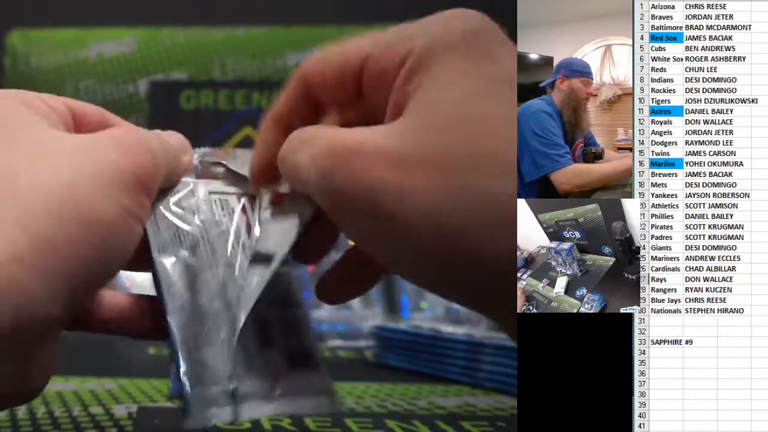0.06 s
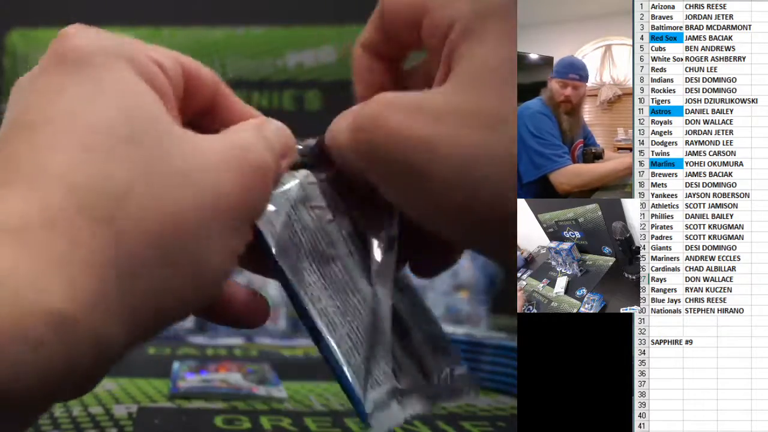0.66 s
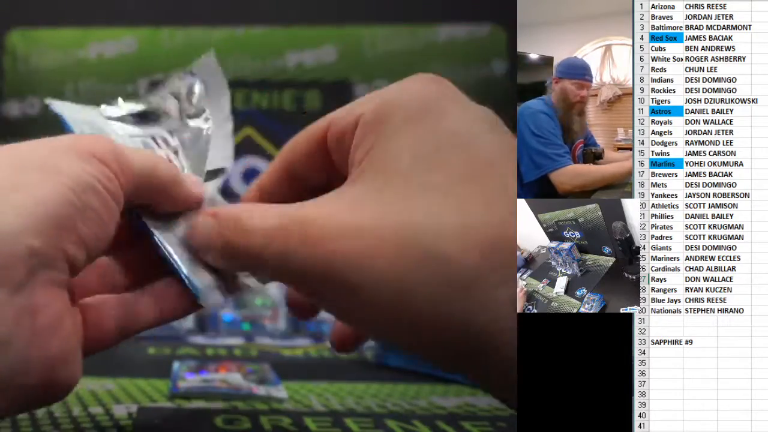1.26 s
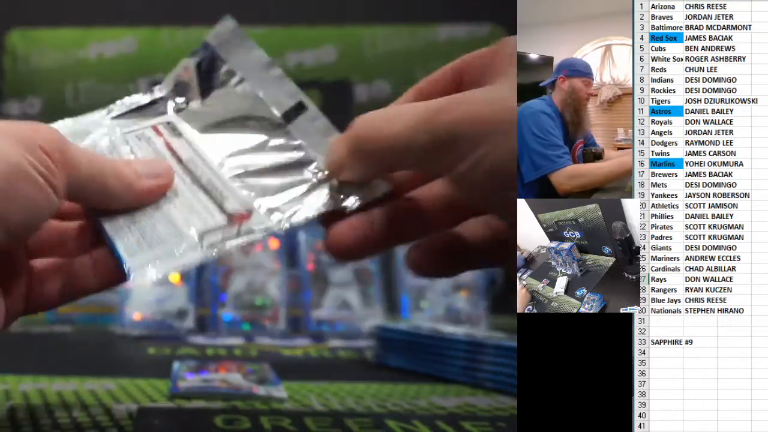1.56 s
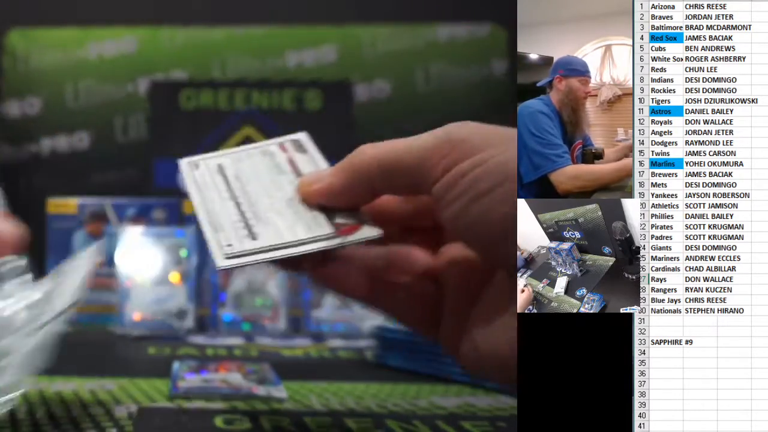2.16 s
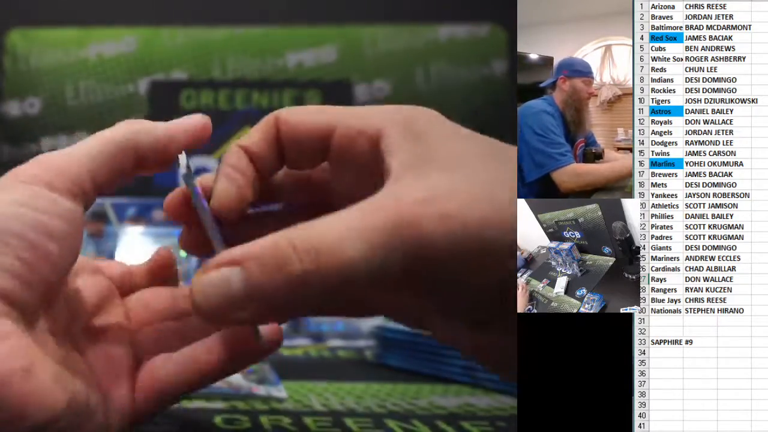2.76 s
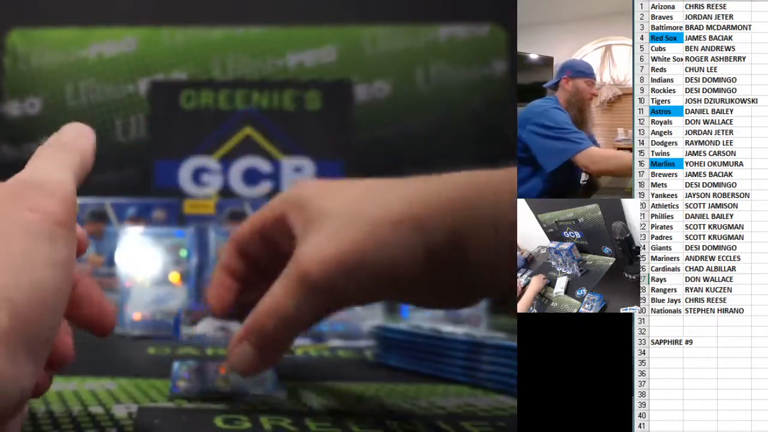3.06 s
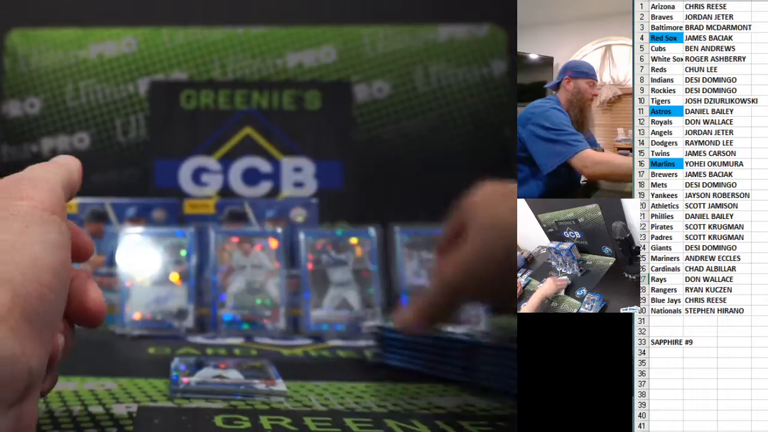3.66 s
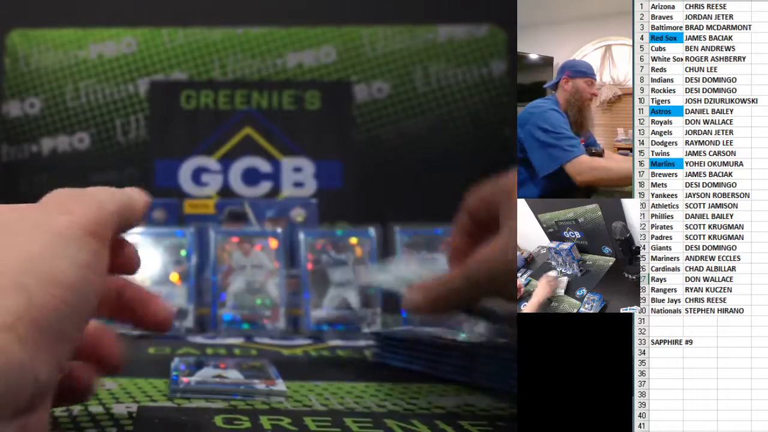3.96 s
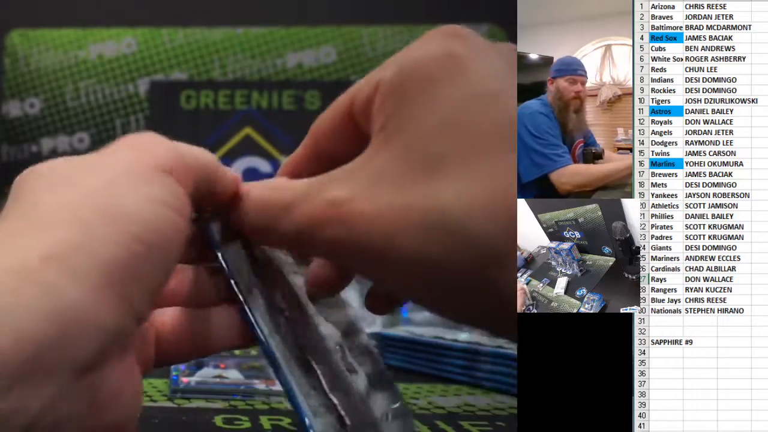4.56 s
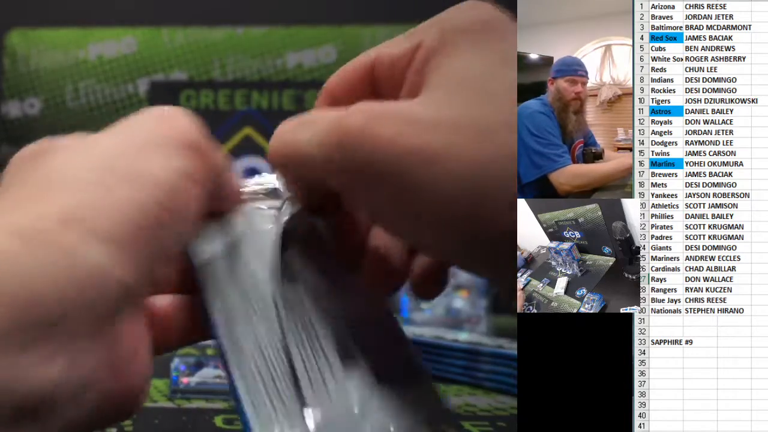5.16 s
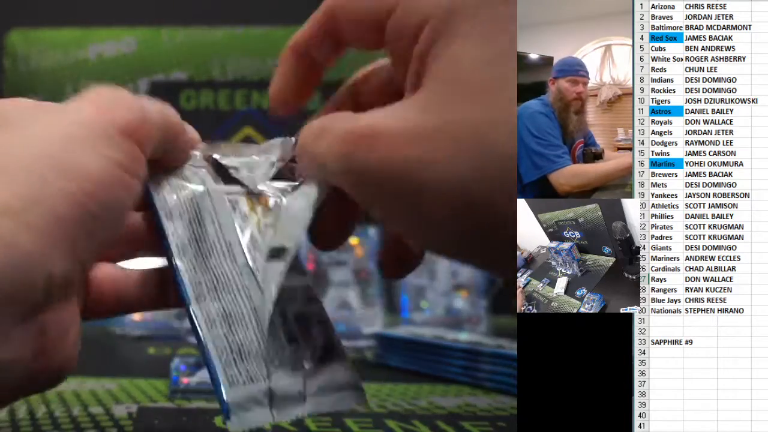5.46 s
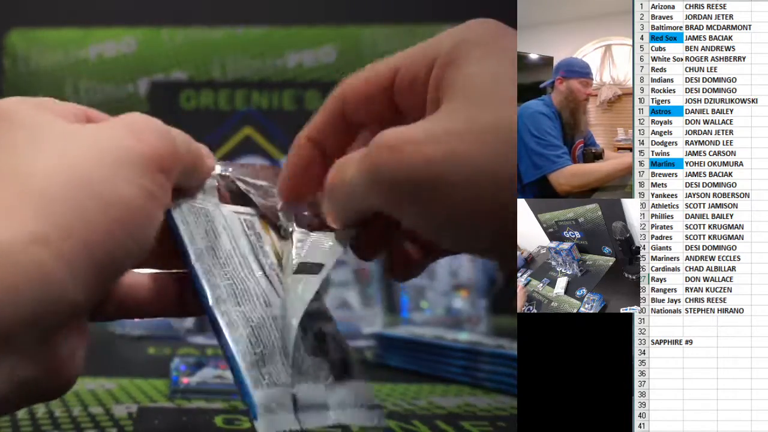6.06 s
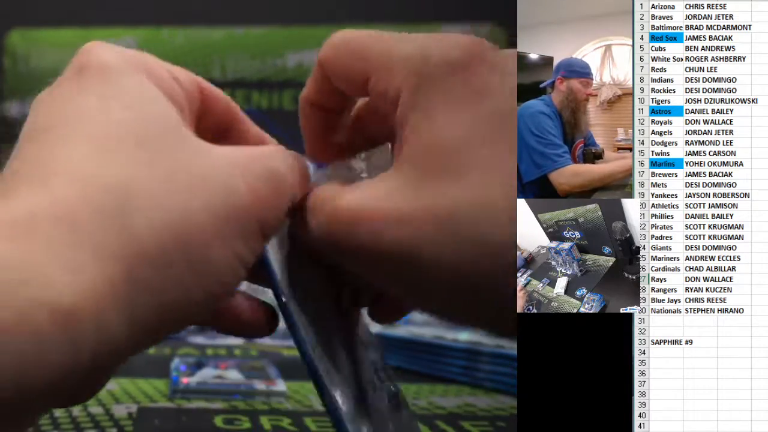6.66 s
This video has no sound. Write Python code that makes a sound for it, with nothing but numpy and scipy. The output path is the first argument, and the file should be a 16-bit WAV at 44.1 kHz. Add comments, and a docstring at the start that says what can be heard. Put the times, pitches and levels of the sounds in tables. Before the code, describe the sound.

Hands pull open a crackling foil pack, lightly tap the cards, pause, and start tearing the next wrapper.

```python
"""Foil crackles and snaps as a pack of trading cards is opened by hand over a table in a small, bare room.
Tiny slips make the crackle, creases flip with a snap, and the pouch pops as it is pulled apart and
buckles. A few taps square the stack of cards. After a pause the next pack is picked up and torn.
Under it all lie a low room rumble and a faint electrical whine."""
import sys
import numpy as np
from scipy import signal
from scipy.io import wavfile
from scipy.ndimage import uniform_filter1d

SR = 44100
rng = np.random.default_rng(int(sys.argv[2]) if len(sys.argv) > 2 else 0)


def generate_wav(signal):
    """Clip the signal to [-1, 1] and save it as 16-bit WAV at the path in sys.argv[1]."""
    frames = np.transpose(np.atleast_2d(signal))
    scaled = np.clip(frames, -1, 1) * 32767
    pcm = np.round(scaled).astype(np.int16)
    wavfile.write(sys.argv[1], SR, pcm)


N = 303849
TIME = np.arange(N) / SR

# Bends and pulls of the foil. Each row: peak time in seconds, swell time in seconds, crackle in dB,
# flexing in dB, crackle tilt in dB per octave.
FOIL_PULLS = [(.005, 0.015, -47.5, -51.5, -3), (0.094, 0.0089, -47, -57, 1),
              (0.141, 0.0089, -46, -47, -1.5), (0.283, 0.011, -53, -52.5, -4), (0.342, .05, -45.5, -47, 2),
              (.415, 0.026, -52.5, -59.5, -13), (.548, 0.0068, -44.5, -48, 7),
              (.597, 0.018, -46.5, -52, 2.5), (0.764, 0.0075, -55, -57.5, -7.5),
              (0.887, 0.025, -53.5, -74, -7.5), (1.151, 0.024, -51.5, -60, 4.5),
              (1.276, 0.07, -56.5, -59.5, -1.5), (1.391, 0.01, -35.5, -56, 1.5),
              (1.426, .02, -39.5, -44.5, -8), (1.463, 0.029, -29, -35, -2), (1.483, 0.025, -35.5, -33, 6),
              (1.521, 0.015, -43, -33, 10), (1.552, 0.017, -42.5, -35, 5.5),
              (1.629, 0.052, -47.5, -51.5, 1), (1.756, 0.0092, -55.5, -54, -3),
              (1.857, 0.0098, -40.5, -45, -1.5), (2.074, 0.031, -67, -53, 2.5), (2.217, .008, -58, -50, -3),
              (3.872, 0.033, -65.5, -60.5, 2), (4.158, 0.025, -63.5, -58, 0), (4.484, 0.016, -59, -75, 6.5),
              (4.554, 0.011, -49.5, -66, 4.5), (4.722, 0.12, -40.5, -52, 2.5),
              (4.923, 0.0065, -52.5, -63, -1.5), (5.029, 0.017, -49, -53.5, 3.5),
              (5.124, .006, -35, -45.5, 5), (5.187, 0.059, -29.5, -38, -2),
              (5.225, 0.052, -49, -42.5, 19.5), (5.337, 0.015, -51, -56, -10),
              (5.742, 0.065, -48, -56.5, -1.5), (5.834, 0.015, -46.5, -57, 2),
              (5.886, 0.031, -47.5, -54.5, -4.5), (5.961, 0.0083, -49.5, -47.5, -4),
              (6.103, 0.0057, -58, -51.5, 0), (6.252, 0.067, -52, -53, -5),
              (6.461, 0.0059, -47.5, -50.5, -0.5), (6.531, 0.056, -53.5, -64, -3),
              (6.646, 0.013, -39, -41, 10), (6.691, 0.028, -41, -43.5, 2), (6.864, 0.012, -52, -65, -1.5)]
# The fingers' steady grip, slack while the cards are out. Each row: time in seconds, crackle in dB.
FINGER_GRIP = [(0, -63.5), (.95, -63), (1.11, -68), (1.3, -66), (2.05, -65), (2.4, -86), (3.55, -93),
               (3.7, -73), (4.0, -85), (4.3, -71), (4.6, -66), (4.9, -68), (5.35, -61), (6.05, -60.5),
               (6.42, -67.5), (6.89, -54.5)]
# Tone of the crackle, the flexing sheet and the rumble. Each row: frequency in Hz, relative level in dB.
CRACKLE_EQ = [(1400, -11.5), (2000, 4.5), (2600, -4), (3400, 7), (4400, 0.5), (6000, 3.5), (7200, 2),
              (8200, -29)]
FLEX_EQ = [(70, -14), (130, -15.5), (250, -10.5), (400, -7), (520, -6), (700, -4.5), (1100, -1.5),
           (1500, -13.5), (2000, -8.5), (2800, -15.5)]
RUMBLE_EQ = [(20, 1.5), (30, -1), (42, -4.5), (62, -3.5), (100, -7), (135, -9), (175, -17.5), (290, -12.5),
             (420, -23.5), (850, -18.5), (1400, -29.5), (2400, -34), (3800, -43.5), (6000, -39.5),
             (8000, -44.5)]
# Electrical whine. Each row: pitch in Hz, rms level in dB ahead of the microphone's roll-off.
WHINE_TONES = [(5001, -92), (5039, -89), (6002, -90), (6498, -94), (6998, -95), (8000, -80)]
# The loudest creases and the pouch's dull pops.
# Each row: start in seconds, relative level in dB, pitch in Hz, sharpness as Q.
CREASE_SNAPS = [(0.0811, -23.5, 3000, 1.2), (0.1366, -31.5, 2760, 0.93), (0.2813, -35.5, 5000, 1.3),
                (.2966, -35, 4600, 1), (0.3372, -30, 4430, 0.52), (0.5474, -34, 4960, 0.47),
                (0.5902, -33, 5740, 1.5), (.6245, -34.5, 2300, .9), (0.8378, -33.5, 3670, 0.54),
                (1.1502, -29.5, 4060, 1.06), (1.3621, -35, 4020, 0.88), (1.3869, -24.5, 4600, 1.2),
                (1.4203, -25, 4380, 0.77), (1.4441, -13.5, 2870, 2.5), (1.4505, -28, 3170, 1.2),
                (1.476, -35, 3490, .7), (1.548, -26, 3240, 0.29), (1.8575, -28.5, 4770, 0.75),
                (2.1249, -41, 4900, 1.4), (2.2155, -43, 1600, 1), (2.2637, -47, 1520, 1),
                (3.8536, -41.5, 4450, 0.53), (3.872, -41.5, 5530, 3.5), (4.2573, -43.5, 5260, 1.7),
                (4.323, -47, 5700, 1.9), (4.44, -51.5, 3440, 0.79), (4.662, -28, 3800, 3.8),
                (4.6748, -45, 5030, 2.1), (4.705, -29.5, 4870, 1.1), (4.923, -26.5, 6360, 0.63),
                (5.1185, -22, 5230, 0.89), (5.1503, -20.5, 4820, 0.77), (5.1837, -27, 3870, 0.45),
                (5.3612, -39.5, 4220, 1.4), (5.453, -36, 3180, 1.2), (5.704, -32.5, 3730, 2.1),
                (5.727, -31.5, 3740, 0.73), (5.882, -36.5, 3580, 1.8), (5.9474, -36.5, 4360, 1.9),
                (5.997, -34, 2540, 0.61), (6.3632, -42, 5160, 1.5), (6.458, -36, 3830, 1.1),
                (6.5007, -35.5, 4140, 0.68), (6.6221, -33.5, 6000, 0.94), (6.6413, -26.5, 5940, 1.2),
                (6.6766, -22.5, 5640, 2.4), (6.7958, -43, 3120, 0.44), (6.8608, -42, 4130, 1.7)]
POUCH_POPS = [(.588, -37.5, 614, 1.9), (.625, -28.5, 1963, 4.4), (.762, -44.5, 703, 6),
              (.883, -45.5, 654, 3.1), (1.232, -40.5, 372, 1.2), (1.464, -22, 630, 2.3),
              (1.482, -21, 614, 0.58), (1.514, -25.5, 630, 3.2), (1.548, -29, 640, 1.3),
              (1.553, -37, 270.5, 8.4), (1.856, -32.5, 546, 0.87), (1.911, -36.5, 810, 2.7),
              (1.971, -37.5, 460, 1.7), (4.154, -38.5, 490, 1.5), (5.023, -39.5, 1054, 3.8),
              (5.119, -35.5, 147, 0.98), (5.179, -32, 690, 2.5), (5.186, -29, 1400, 1.5),
              (5.999, -34.5, 1310, 3.6), (6.112, -36.5, 416, 1.9), (6.643, -27, 602, 4.8),
              (6.646, -41, 273, 5.3), (6.83, -40, 715, 2.8)]
# The card stack and the next pack knock against hand and table.
# Each row: start in seconds, relative level in dB, clack pitch in Hz, thud pitch in Hz.
CARD_TAPS = [(2.1769, -36, 1100, 151), (2.2121, -34, 900, 240), (2.2617, -30.5, 990, 302),
             (2.472, -59, 1600, 200), (2.551, -53, 1100, 200), (3.696, -59, 1700, 200),
             (3.768, -49, 1450, 205), (3.853, -52, 1177, 162), (4.152, -43.5, 718, 203)]
# Hollow ring of the table top. Each row: pitch in Hz, bandwidth in Hz, relative level in dB.
TABLE_MODES = [(272, 30, -6), (422, 22, -5), (631, 11, 5), (687, 12, -2), (752, 20, -2), (952, 20, -6),
               (1073, 22, -5), (1126, 14, -1), (1331, 12, -1), (1545, 40, -5)]
# The room's tail. Each row: frequency in Hz, seconds to fall by 60 dB.
ROOM_DECAY = [(200, 0.53), (600, 0.44), (1400, 0.42), (3700, 0.36), (8000, 0.29)]
# Stereo width. Each row: frequency in Hz, left-right likeness from 0 (wide) to 1 (mono).
STEREO_LIKENESS = [(60, 0.83), (250, 0.86), (700, 0.95), (1000, 0.07), (2000, .05), (4000, 0.087),
                   (8000, .9)]
# Lean of the diffuse sound. Each row: frequency in Hz, left minus right in dB.
STEREO_BALANCE = [(100, 1.5), (550, 1), (1500, 4), (2800, -1), (5000, -4), (8000, -4.5)]
SIDES = np.array([[1], [-1]])   # left, right


def from_db(db):
    """Decibels to gain."""
    return 10 ** (np.asarray(db) / 20)


def unit_rms(x):
    """Scale to unit rms."""
    return x / np.sqrt(np.mean(x ** 2) + 1e-20)


def at_hz(points, hz):
    """Read a table on a log-frequency axis."""
    freqs, values = np.transpose(points)
    return np.interp(np.log(hz), np.log(freqs), values)


def drift(turns_per_s):
    """Random wandering with roughly unit spread."""
    knots = rng.standard_normal(4096)
    return np.interp(TIME * turns_per_s, np.arange(len(knots)), knots)


def resonate(x, hz, width_hz):
    """Two-pole resonance with unit gain at its peak."""
    r = np.exp(-np.pi * width_hz / SR)
    feedback = [1, -2 * r * np.cos(2 * np.pi * hz / SR), r * r]
    return signal.lfilter(np.array([1, 0, -1]) * (1 - r * r) / 2, feedback, x + 1e-18)


def add(track, start_s, sound):
    """Mix a short sound into a track."""
    start = max(0, int(start_s * SR))
    track[..., start:start + sound.shape[-1]] += sound[..., :N - start]


def stereo_bands(size):
    """Diffuse noise in half-octave bands: yields each centre in Hz with its stereo noise."""
    edges = np.geomspace(18, 9200, 19)
    white = rng.standard_normal((2, 2, size + SR // 2))
    for k, (low, high) in enumerate(zip(edges, edges[1:])):
        bandpass = signal.butter(2, [low, high], "band", fs=SR, output="sos")
        mid, side = signal.sosfilt(bandpass, white[k % 2])[:, -size:]
        hz = np.sqrt(low * high)
        alike = np.clip(at_hz(STEREO_LIKENESS, hz), -.99, .99)
        noise = np.sqrt(1 + alike) * mid + np.sqrt(1 - alike) * side * SIDES
        yield hz, noise * from_db(SIDES * at_hz(STEREO_BALANCE, hz) / 2)


def handling(swell_db=18, release_db_per_s=344.5, grip_flex_db=-1):
    """Each pull swells and lets go over the steady grip: curves of crackle dB, flexing dB and tilt."""
    crackle = from_db(np.interp(TIME, *np.transpose(FINGER_GRIP))) ** 2
    flex = crackle * from_db(grip_flex_db) ** 2
    tilt = np.zeros(N)
    for peak_s, swell_s, crackle_db, flex_db, tilt_db in FOIL_PULLS:
        span = slice(max(0, int((peak_s - 2 * swell_s) * SR)), int((peak_s + .5) * SR))
        t = TIME[span] - peak_s
        shape_db = np.where(t < 0, -swell_db * (t / swell_s) ** 2, -release_db_per_s * t)
        power = from_db(crackle_db + shape_db) ** 2
        crackle[span] += power
        tilt[span] += tilt_db * power   # the strongest pull sets the brightness
        flex[span] += from_db(flex_db + shape_db) ** 2
    return 10 * np.log10(crackle), 10 * np.log10(flex), tilt / crackle


def slips(per_s, eq, tilt_db, facets, q, spread_db, bleed_db, lag_spread_s):
    """Tiny uneven slips each ring one facet of the foil and the rest faintly, at an even overall level."""
    onsets = np.flatnonzero(rng.random(N) < per_s * from_db(4 * drift(60)) / SR)
    sizes = from_db(spread_db * np.minimum(rng.exponential(1, N), 3.5))[onsets]
    facet = rng.integers(0, facets, N)[onsets]
    lag_s = 2.5e-5 + lag_spread_s * rng.standard_normal(N)[onsets]   # delay to the right microphone
    right_onsets = np.clip(onsets + np.round(SR * lag_s).astype(int), 0, N - 1)
    out = np.zeros((2, N))
    for k, hz in enumerate(np.geomspace(eq[0][0], eq[-1][0], facets)):
        strength = np.where(facet == k, 1, from_db(bleed_db)) * rng.choice([-1, 1], N)[onsets]
        colour = from_db(at_hz(eq, hz) + tilt_db[onsets] * np.log2(hz / 4000))
        clicks = np.zeros((2, N))
        clicks[0, onsets] = clicks[1, right_onsets] = sizes * strength * colour
        out += resonate(resonate(clicks, hz, hz / q), hz, hz / q)
    power = np.mean(out ** 2, axis=0)
    return out / np.sqrt(np.abs(uniform_filter1d(power, size=1800)) + 1e-3 * np.mean(power))


def crinkle(slips_per_s=750, reference_db=-52, thickening=.55):
    """The foil's bright crackle and lower flexing: harder handling makes both louder and denser."""
    crackle_db, flex_db, tilt_db = handling()
    per_s = slips_per_s * from_db(thickening * (crackle_db - reference_db))
    crackle = slips(per_s, CRACKLE_EQ, tilt_db, facets=12, q=4.07,
                    spread_db=3.5, bleed_db=-17.5, lag_spread_s=7e-5)
    flex = slips(2 * per_s, FLEX_EQ, tilt_db=np.zeros(N), facets=14, q=2.73,
                 spread_db=1.5, bleed_db=-12, lag_spread_s=1.4e-4)
    return from_db(crackle_db) * crackle, from_db(flex_db) * flex


def table_ring(x):
    """Low sounds wake the hollow resonances of the table."""
    return sum(from_db(db) * resonate(x.mean(axis=0), hz, width) for hz, width, db in TABLE_MODES)


def room(x, wet_db, build_s, bounce_db=(-12, -14), bounce_s=(.0013, .0012)):
    """Direct sound, a bounce off the table to each side and a diffuse tail that dies band by band."""
    t = TIME[:int(.7 * SR)]
    tail = sum(noise * from_db(-60 * t / at_hz(ROOM_DECAY, hz)) for hz, noise in stereo_bands(len(t)))
    tail *= 1 - np.exp(-t / build_s)
    unity_gain = np.sqrt(9200 / (SR / 2) / len(t))   # for a tail 9200 Hz wide
    response = from_db(wet_db) * unit_rms(tail) * unity_gain
    response[:, 0] += 1
    for side in range(2):
        response[side, int(bounce_s[side] * SR)] += from_db(bounce_db[side])
    return signal.fftconvolve(x, response, axes=1)[:, :N]


def room_rumble(level_db, waver_db):
    """A low bed of room noise that wavers band by band, most in the bass."""
    bands = (noise * from_db(at_hz(RUMBLE_EQ, hz) + waver_db * drift(11) / (1 + hz / 500))
             for hz, noise in stereo_bands(N))
    return from_db(level_db) * unit_rms(sum(bands))


def electrical_whine(waver_db):
    """Thin, high tones that each slowly swell and fade."""
    out = np.zeros(N)
    for hz, db in WHINE_TONES:
        amplitude = np.sqrt(2) * from_db(db + waver_db * drift(3))
        out += amplitude * np.sin(2 * np.pi * (hz * TIME + rng.random()))
    return out


def twang(hz, q, chatter_s, chatter_db):
    """A first click and a brief chatter, different on each side, ring one resonance."""
    t = TIME[:4096]
    chatter = rng.standard_normal((2, len(t))) * np.exp(-t / chatter_s)
    alike = np.clip(at_hz(STEREO_LIKENESS, hz), 0, 1)
    chatter[1] = alike * chatter[0] + np.sqrt(1 - alike ** 2) * chatter[1]
    ring = from_db(chatter_db) * chatter / np.sqrt(np.sum(chatter ** 2) / 2)
    ring[0, 0] += 1
    ring[1, 1] += 1   # the click lands a sample later on the right
    for _ in range(3):
        ring = resonate(ring, hz, hz / q)
    energy = np.sum(ring ** 2, axis=1, keepdims=True)
    return ring * np.sqrt(SR / 1000 / energy)   # as much energy as 1 ms at unit level


def buckles(events, gain_db, chatter_s, chatter_db):
    """Foil flips once and rings at a pitch set by its size: a crease snaps, a whole panel pops."""
    out = np.zeros((2, N))
    for start_s, db, hz, q in events:
        add(out, start_s, from_db(db + gain_db) * twang(hz, q, chatter_s, chatter_db))
    return out


def card_taps(gain_db, thud_db, q, chatter_s):
    """Card edges land one after another in a broad clack over the thud of the whole stack."""
    out = np.zeros((2, N))
    for start_s, db, clack_hz, thud_hz in CARD_TAPS:
        clack = twang(clack_hz, q, chatter_s, chatter_db=7.5)
        thud = twang(thud_hz, q, chatter_s, chatter_db=0)
        add(out, start_s, from_db(db + gain_db) * (clack + from_db(thud_db) * thud))
    return out


def scene():
    """Bright foil, hollow pouch and drier card taps share the room, over a bed of rumble and whine."""
    crackle, flex = crinkle()
    pops = buckles(POUCH_POPS, gain_db=-1.5, chatter_s=.0063, chatter_db=-4.5)
    snaps = buckles(CREASE_SNAPS, gain_db=-2.5, chatter_s=.0022, chatter_db=.5)
    foil = room(crackle + snaps, wet_db=-2, build_s=.00089, bounce_db=(-8, -12), bounce_s=(.00135, .0009))
    lows = flex + pops
    pouch = room(lows, wet_db=-1.5, build_s=.00085) + from_db(6.5) * table_ring(lows)
    pouch *= from_db(SIDES * 1.15 / 2)   # a touch to the left
    taps = card_taps(gain_db=-2.5, thud_db=2.5, q=.74, chatter_s=.0088)
    cards = room(taps, wet_db=-7.5, build_s=.0028)
    return foil + pouch + cards + room_rumble(level_db=-56, waver_db=2) + electrical_whine(waver_db=2)


def record(dry):
    """The microphone's narrow band rolls off steeply above 7800 Hz."""
    return signal.sosfilt(signal.butter(22, 7800, fs=SR, output="sos"), dry)


dry = scene()
out = record(dry)
generate_wav(out)
```